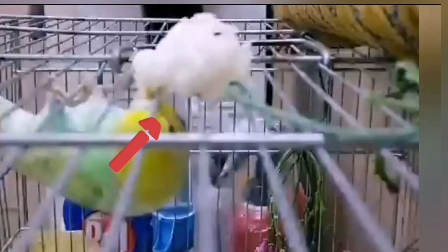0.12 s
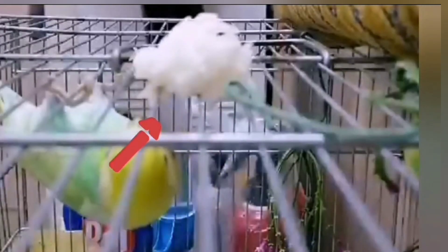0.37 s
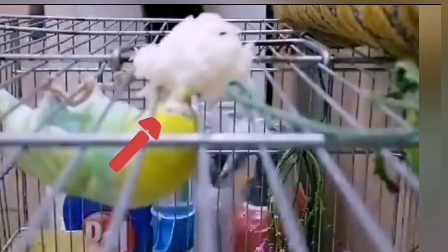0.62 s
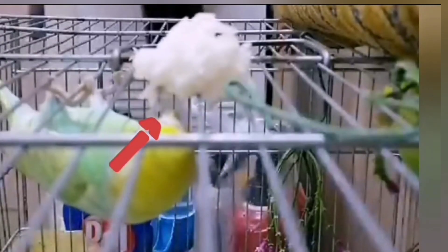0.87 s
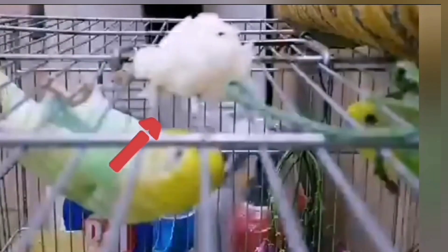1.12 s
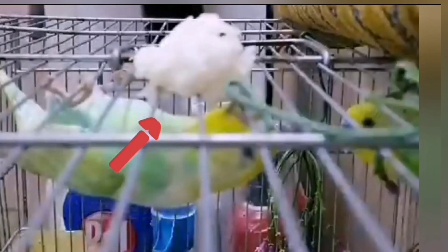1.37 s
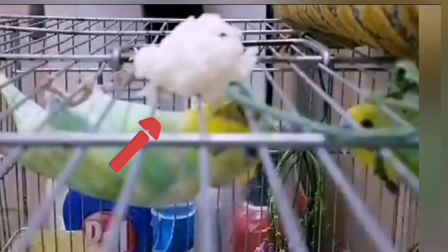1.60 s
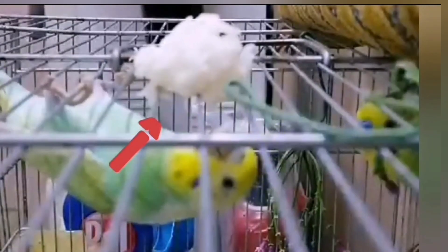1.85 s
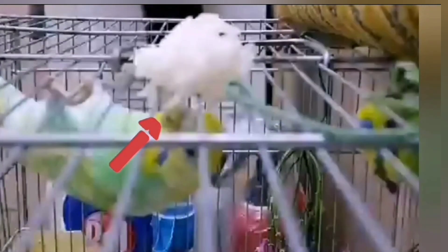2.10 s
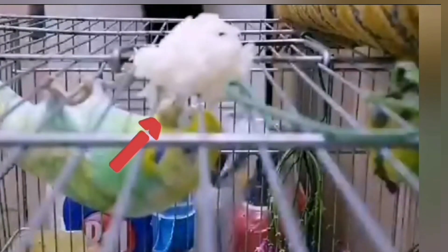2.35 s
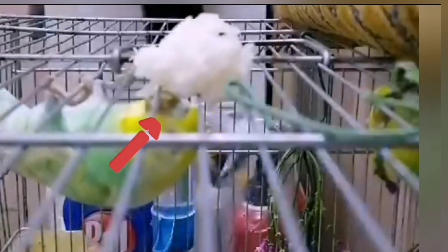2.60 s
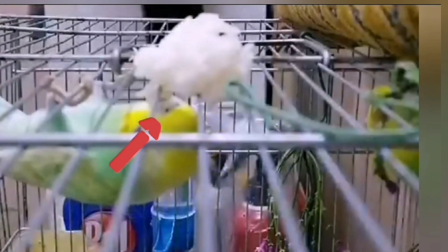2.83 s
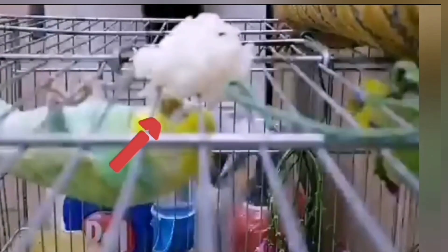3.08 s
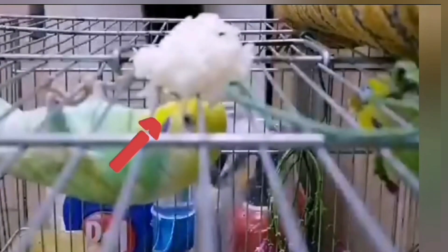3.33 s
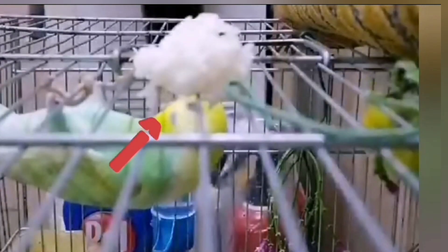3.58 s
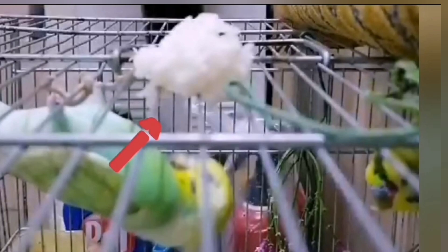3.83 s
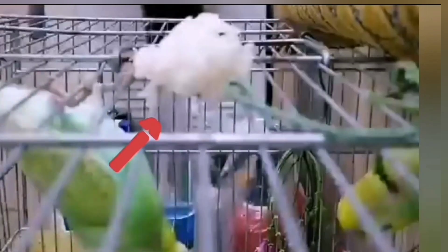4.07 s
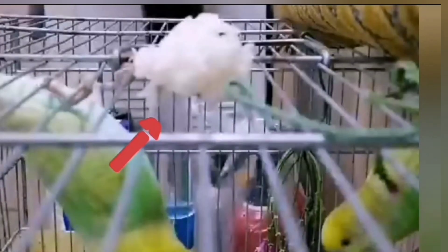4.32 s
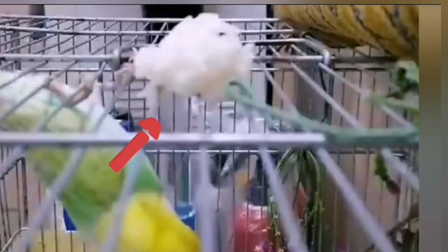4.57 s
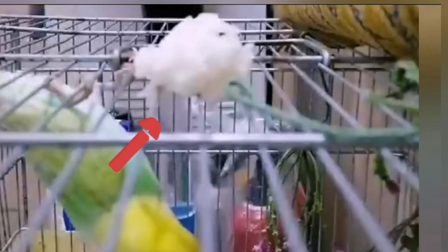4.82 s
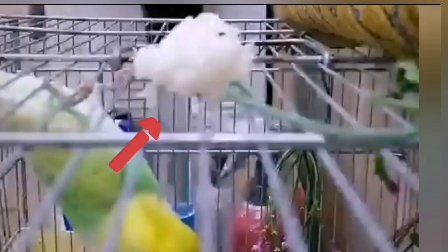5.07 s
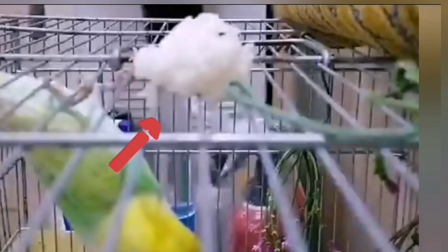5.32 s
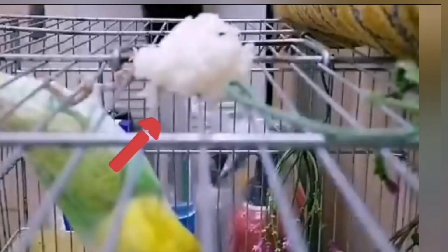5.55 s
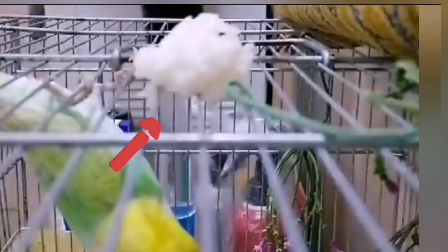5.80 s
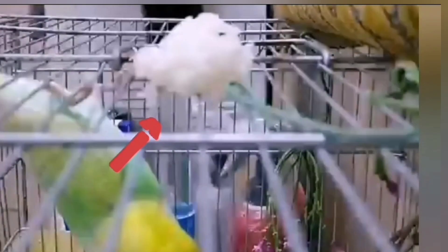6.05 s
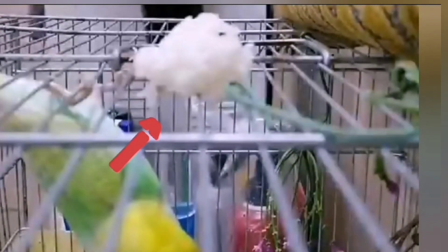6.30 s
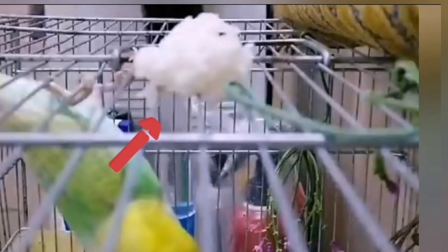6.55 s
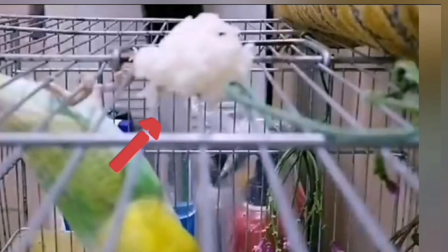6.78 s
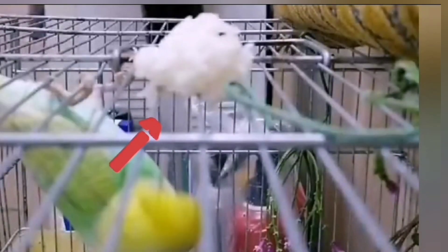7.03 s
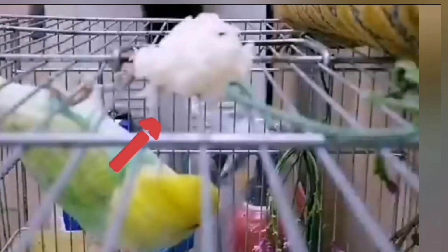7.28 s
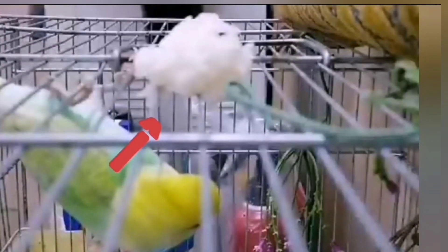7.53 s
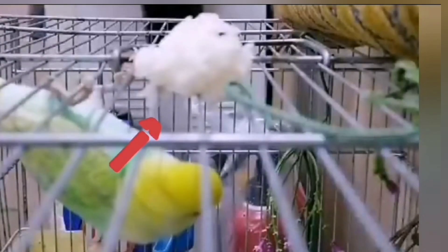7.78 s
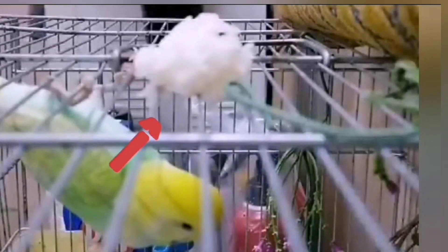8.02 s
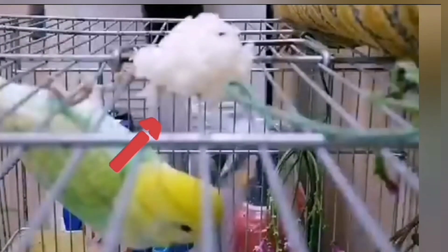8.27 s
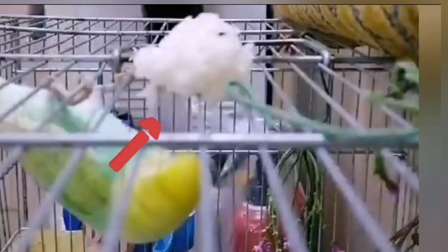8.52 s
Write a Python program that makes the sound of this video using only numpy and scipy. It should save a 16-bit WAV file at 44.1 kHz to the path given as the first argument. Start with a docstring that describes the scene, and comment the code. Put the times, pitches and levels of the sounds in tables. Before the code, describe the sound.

A small parrot moves about a wire cage, heard close in stereo in a quiet room. Quick gritty scrapes and sharp beak ticks come first, then a sparse passage with separate cage jolts that shimmer briefly. A busier cluster of clacks, muted metal pings and scratches follows around the middle, then isolated small taps, and a last firm rattle with a scrape near the end.

```python
"""Parrot climbing in its cage

A small parrot climbs about its wire cage in a quiet room, close to a stereo microphone. Beak and claws tick
on the bars (short bright noise cracks); harder grips jolt the cage, which shimmers briefly (fading streaky noise).
Claws and feathers slide along the wires in soft gritty swishes, a small metal toy pings in blurred modes,
weight thumps dully on the frame, and the room murmurs with drifting air noise."""
import sys
import numpy as np
from scipy import signal
from scipy.fft import rfft, irfft, next_fast_len
from scipy.io import wavfile
from scipy.ndimage import uniform_filter1d, map_coordinates

SR = 44100
rng = np.random.default_rng(int(sys.argv[2]) if len(sys.argv) > 2 else 0)


def persist_wave(psi):
    """Save psi, clipped to +-1, as 16-bit WAV."""
    counts = np.round(np.clip(psi, -1, 1) * 32767).astype(np.int16)
    wavfile.write(sys.argv[1], SR, np.atleast_2d(counts).T)


def field_ratio(decibels):
    """Amplitude ratio for a level in dB (20 dB per decade); scalars and array-likes work."""
    return 10 ** (np.asarray(decibels, dtype=float) / 20)


N = 381024  # samples

# room air over time: t/s, rumble level/dB, murmur level/dB, hiss level/dB
AIR_LEVELS = [(0.0, -58, -59, -71), (0.65, -55.5, -58, -68), (0.98, -53, -57.5, -66.5),
              (3.5, -58, -60.5, -69), (7.1, -58, -63, -71.5), (7.95, -60, -62.5, -70),
              (8.35, -54.5, -63.5, -72), (8.64, -54.5, -60.5, -71)]
# colours of the three air layers: f/Hz, level/dB
RUMBLE_COLOUR = [(8.8, -20), (15, -2), (38, 3), (59, -1), (75, -6), (107, -1), (179, -6), (209, -3),
                 (350, -21), (460, -49), (770, -120)]
MURMUR_COLOUR = [(180, -31), (300, -2), (327, -7.5), (361, -6.5), (562, -8.5), (620, -8.5), (988, -5.5),
                 (1410, -12.5), (3290, -12.5), (4000, -24.5), (5200, -30), (8800, -120)]
HISS_COLOUR = [(2060, -72), (3500, 6), (3960, 0.5), (5230, 6), (6570, 4), (8570, 4.5), (11300, -4),
               (15000, -3), (16500, -12)]
# left-right likeness of the diffuse air: f/Hz, likeness/1
AIR_LIKENESS = [(60, 0.85), (120, 0.91), (240, 0.83), (480, 0.42), (950, 0.092), (1890, 0.1), (3770, -0.33),
                (7520, 0.66), (15000, 0.93)]
# left-right likeness of the nearby cage: f/Hz, likeness/1
CAGE_LIKENESS = [(60, 0.97), (130, 0.17), (290, 0.042), (640, 0.83), (1410, -0.074), (3100, -0.021),
                 (6820, 0.49), (15000, 1)]
# how the microphone ports face the cage: f/Hz, left-right level/dB
PORT_LEAN = [(600, -6.5), (2000, -0.5), (4000, -5), (8500, 3), (13000, 1)]

# weight landing on the frame: t/s, level/dB, tray against frame level/dB, left-right level/dB, t60/s
THUMPS = [(1.745, -49.5, -22, 1, 0.18), (2.27, -64, -3.5, 4, 0.43), (3.443, -51.5, -17, -6, 0.088),
          (4.173, -46, -4.5, 5, 0.27), (4.698, -50, 8, -6.5, 0.47), (4.992, -49, -33, 5, 0.31),
          (5.621, -54, -10, -8, 0.054), (5.997, -56, -11, -8, 0.041), (7.886, -45.5, -24, 5, 0.17),
          (8.468, -48.5, -5.5, 4, 0.22)]
# colours of the frame and the tray: f/Hz, level/dB
FRAME_COLOUR = [(350, -18), (500, -8), (800, -2), (1300, -3.5), (1800, -54)]
TRAY_COLOUR = [(70, -15), (120, -10.5), (270, 1), (450, -4), (680, -10), (900, -32)]

# pings of the toy: t/s, level/dB, extra upper mode level/dB, left-right level/dB, damping/1 (1 = free)
PINGS = [(4.257, -50, -20, -7, 8.8), (4.33, -41, -22, -19, 13), (5.364, -54, -20, -9, 12),
         (5.621, -43.5, -16, -20, 20), (5.999, -47, -20, -14, 19), (6.687, -47.5, 4, -2, 0.96)]
# modes of the toy: f/Hz, level/dB, free t60/s, blur/Hz
TOY_MODES = [(2575, -1.5, 0.32, 210), (5900, -29, 0.087, 200), (7280, -0.5, .28, 330),
             (8280, 1.5, 0.16, 550), (9900, -4, 0.2, 470), (11800, -15, .25, 200), (12500, -11, 0.23, 300)]

# claws and feathers sliding on the wires, one row a stroke:
# loudest t/s, level/dB, hold/s, panel against wires level/dB, left-right level/dB
SLIDES = [(0.01, -37.5, 0.018, -14, -8), (0.074, -40, 0.0041, -24, -3), (0.272, -40, 0.0061, -21, 0.5),
          (0.315, -36.5, 0.0064, -19.5, 1), (0.429, -43.5, 0.051, -10.5, -8), (0.517, -45, .005, -29, -1),
          (0.627, -51, 0.037, -30, -1), (0.777, -48.5, 0.079, -32, 2.5), (0.857, -49.5, 0.032, -27, -1),
          (1.843, -42, 0.012, -11, -11), (3.052, -40, 0.028, -12.5, -8), (3.119, -58, 0.038, -17, -14),
          (4.31, -48, .01, -16, -2.5), (4.532, -52, 0.027, -15.5, 2), (4.587, -42, 0.014, -14, 2.5),
          (4.651, -47.5, 0.078, -12.5, -0.5), (4.797, -61.5, 0.043, -9, -2),
          (5.132, -41, 0.06, -13.5, -0.5), (5.225, -55.5, 0.04, -2.5, -3), (8.055, -38.5, 0.036, -14, -2.5),
          (8.105, -50, 0.025, -16, -7)]
# colour of sliding on the wires, before its hump: f/Hz, level/dB
SWISH_COLOUR = [(2240, -26), (3800, -5), (4350, -4.5), (5580, -3), (7040, -2.5), (7760, -3.5), (8790, -1),
                (11500, -7), (15000, -42), (22000, -120)]
# colours of the cage parts, low to high: f/Hz, level/dB
LOW_PANEL_COLOUR = [(900, -26), (1300, -9.5), (1750, 2.5), (2100, 2), (2500, -51)]
PANEL_COLOUR = [(2000, -20), (2400, -1.5), (2800, 3.5), (3250, -2), (3700, -11.5), (4400, -22), (5500, -52)]
BARS_COLOUR = [(2240, -12), (3800, -6), (4370, -5), (5530, 0), (7170, 3.5), (8200, 2), (8910, 3.5),
               (10800, -4.5), (11500, -13), (15000, -34), (22000, -120)]
TOP_COLOUR = [(6180, -11.5), (10500, 12), (15100, 19), (16100, -35), (16300, -44), (16500, -55)]

# jolts of the cage: t/s, shimmer level/dB, low panel and panel against shimmer level/dB, left-right level/dB
JOLTS = [(0.3526, -38.5, -5.5, -7.5, -7.5), (0.714, -52, -20, -28, 1), (1.156, -50, -7, -5, -9),
         (1.5177, -64, 1.5, -2, -13), (1.7428, -32, -10, -1, -6), (1.94, -61, -20, -17, -14),
         (2.2692, -33, -6.5, -4, -3), (2.4073, -50.5, -35, -27, -8), (2.6968, -63, 1, -3, -10),
         (2.956, -56.5, 2.5, 5, -7), (3.4425, -34, -8.5, -7.5, -8.5), (3.729, -65.5, -0.5, -2, -16),
         (4.1721, -32.5, -12, -2, -4.5), (4.6996, -45.5, -3, -0.5, -5.5), (4.9903, -38.5, -6.5, -4, -2.5),
         (5.723, -61.5, -23, -7, -9), (6.6876, -54.5, -33, -2, -2), (7.13, -59, -5.5, -31, 1),
         (7.865, -46, -21, -22, 1), (7.885, -36, -8.5, -2.5, 4), (8.3574, -65, -6, -28, -4),
         (8.4628, -54, 0, -3, -4.5)]
# dry ticks of beak and claw: t/s, peak level of the left-right mean before panning/dB, centre f/Hz,
# left-right level/dB
TICKS = [(0.0667, -25, 8170, 7), (0.181, -43, 9700, 1), (0.3551, -23, 9400, 16.5), (0.6766, -37, 9400, 1),
         (0.7148, -31.5, 9650, 4), (0.7881, -25, 9200, 2), (0.851, -29, 10000, -1), (0.976, -45, 9100, 0),
         (1.74, -28, 7560, -12), (1.7542, -29, 6750, -14), (1.963, -44.5, 9170, 10), (2.095, -52, 9500, 0),
         (2.2722, -23, 9300, 0), (2.2799, -21.5, 7070, -4), (2.407, -27.5, 8950, 9),
         (2.421, -33, 7390, -1.5), (3.442, -28, 8790, -1), (3.453, -38, 4900, -4), (4.143, -53, 9300, -7),
         (4.173, -21, 7040, -6.5), (4.183, -22, 7400, 1), (4.585, -44, 8800, 3), (4.951, -52, 9500, 3),
         (5.0, -38, 7400, -20), (5.364, -53, 8000, -5), (5.621, -51.5, 10600, -12),
         (5.9976, -38, 7700, -19.5), (6.375, -53, 8100, -3), (6.851, -52.5, 9000, -4),
         (6.6892, -34, 8000, 0), (7.1281, -40.5, 7800, -6), (7.887, -23.5, 9000, 8), (7.898, -28, 7000, -8)]

SWELL_DB_PER_S, FADE_DB_PER_S, PANEL_FADE_DB_PER_S = 319, 271, 202  # a stroke grows and fades; panels ring on
LOW_PANEL_DB, TOP_DB = -7, -8  # in a stroke: low panel against the panel, top against the swish
BRIGHT_HZ, BRIGHT_HZ_PER_DB = 8800, 179  # wires on the left side sound brighter
JOLT_TOP_DB, TOP_LOSS = -7, 0.33  # top against the shimmer; the more the panel takes, the less treble


def unit(x):
    """Scales a signal to rms 1."""
    return x / np.sqrt(np.mean(x ** 2) + 1e-20)


def along(points, hz):
    """Reads (f/Hz, value) points on a log frequency axis."""
    f, v = np.transpose(points)
    return np.interp(np.log(hz + 1), np.log(f + 1), v)


def curves(rows):
    """Draws one value per sample for each column after the time."""
    s, *columns = np.transpose(rows)
    return [np.interp(np.arange(N) / SR, s, column) for column in columns]


def wobble(rate):
    """Draws a smooth random curve with rate knots a second."""
    knots = rng.standard_normal(int(N * rate / SR) + 4)
    return map_coordinates(knots, [np.arange(N) * rate / SR])


def sides(pan_db):
    """Left and right gain for a left-right level difference."""
    return field_ratio(np.array([pan_db / 2, -pan_db / 2]))


def tuned(colour, hz, boost_db, octaves):
    """Adds a hump around one pitch to a colour."""
    grid = np.geomspace(200, 20000, 240)
    hump = boost_db * np.exp(-(np.log2(grid / hz) / octaves) ** 2)
    return np.transpose([grid, along(colour, grid) + hump])


def rush(colour, likeness, size=N, lean=((100, 0),), streak_db=0, streak_hz=60):
    """Stereo noise of rms 1 with a colour, a likeness between the sides and random narrow streaks."""
    padded = next_fast_len(size)
    hz = np.fft.rfftfreq(padded, 1 / SR)
    # the angle shares the power between mid and side so that the sides correlate as asked
    angle = np.arccos(np.clip(along(likeness, hz), -1, 1)) / 2
    streaks = map_coordinates(rng.standard_normal(2000), [hz / streak_hz])
    gain = field_ratio(along(colour, hz) + streak_db * streaks)
    mid, side = rfft(rng.standard_normal((2, padded))) * gain * [np.cos(angle), np.sin(angle)]
    left_right = np.array([mid + side, mid - side]) * sides(along(lean, hz))
    return unit(irfft(left_right, padded)[:, :size])


def patchy(x, size, wide, long, depth_db):
    """Random patches of gain, wide bins by long frames, with an rms depth in dB."""
    z = signal.stft(x, nperseg=size)[2]
    field = uniform_filter1d(rng.standard_normal(z.shape[1:]), wide, axis=0)
    field = uniform_filter1d(field, long, axis=1)
    return signal.istft(z * field_ratio(depth_db * unit(field)), nperseg=size)[1][:, :N]


def add(track, s, sound):
    """Mixes a short sound into a track at a time."""
    part = track[..., max(round(s * SR), 0):][..., :sound.shape[-1]]
    part += sound[..., :part.shape[-1]]


def air():
    """Low rumble, a murmur of far air flow and the microphone's hiss, in faint drifting patches."""
    rumble_db, murmur_db, hiss_db = curves(AIR_LEVELS)
    rumble = field_ratio(rumble_db + 1.2 * wobble(5)) * rush(RUMBLE_COLOUR, AIR_LIKENESS)
    murmur = field_ratio(murmur_db) * rush(MURMUR_COLOUR, AIR_LIKENESS)
    hiss = field_ratio(hiss_db) * rush(HISS_COLOUR, AIR_LIKENESS)
    return patchy(rumble + murmur + hiss, size=4096, wide=3, long=3, depth_db=2.0)


def thumps():
    """Frame and tray answer a shifted weight with a dull, short rumble, a little different each time."""
    t, out = np.arange(SR // 2) / SR, np.zeros((2, N))
    onset = 1 - np.exp(-t / 0.0021)
    for s, db, tray_db, pan_db, t60 in THUMPS:
        fade = field_ratio(db - 60 * t / t60) * onset * sides(pan_db)[:, None]
        frame = rush(FRAME_COLOUR, CAGE_LIKENESS, size=len(t), streak_db=4.5)
        tray = rush(TRAY_COLOUR, CAGE_LIKENESS, size=len(t), streak_db=2.0)
        add(out, s, fade * (frame + field_ratio(tray_db) * tray))
    return out


def toy():
    """Each mode of the toy is a cluster of close partials, so it beats and blurs; a foot may damp it."""
    t, out = np.arange(SR // 2) / SR, np.zeros((2, N))
    onset = 1 - np.exp(-t / 0.00026)
    for s, db, upper_db, pan_db, damping in PINGS:
        for k, (hz, mode_db, t60, blur_hz) in enumerate(TOY_MODES):
            peak = [(hz - 5 * blur_hz, -60), (hz - blur_hz, -14), (hz, 0),
                    (hz + blur_hz, -14), (hz + 5 * blur_hz, -60)]
            cluster = rush(peak, CAGE_LIKENESS, size=len(t))
            level_db = db + mode_db + upper_db * (k > 0)  # the lowest mode is left alone
            fade = field_ratio(level_db - 60 * damping * t / t60) * onset
            add(out, s, sides(pan_db)[:, None] * fade * cluster)
    return out


def slides():
    """A dense, gritty stream of tiny catches; each stroke swells, holds and fades, and the panels ring on a little."""
    out, t = np.zeros((2, N)), np.arange(-SR // 4, SR // 3) / SR  # t = 0 is the middle of the hold
    for s, db, hold_s, panel_db, pan_db in SLIDES:
        early, late = np.maximum(-t - hold_s / 2, 0), np.maximum(t - hold_s / 2, 0)
        swell_db = db - SWELL_DB_PER_S * early
        wires_db = swell_db - FADE_DB_PER_S * late
        body_db = swell_db + panel_db - PANEL_FADE_DB_PER_S * late
        swish = tuned(SWISH_COLOUR, BRIGHT_HZ + BRIGHT_HZ_PER_DB * pan_db, boost_db=10.5, octaves=0.67)
        before = max(-round((s + t[0]) * SR), 0)  # samples that fall ahead of the start
        layers = [(swish, wires_db, 2.6), (LOW_PANEL_COLOUR, body_db + LOW_PANEL_DB, 4),
                  (PANEL_COLOUR, body_db, 4), (TOP_COLOUR, wires_db + TOP_DB, 2.5)]
        for colour, level_db, streak_db in layers:
            stream = rush(colour, CAGE_LIKENESS, size=len(t), lean=PORT_LEAN, streak_db=streak_db, streak_hz=90)
            stroke = field_ratio(level_db) * sides(pan_db)[:, None] * stream
            add(out, s + t[0], stroke[:, before:])
    grit = field_ratio(0.67 * wobble(350) + 1.27 * wobble(60))
    return patchy(out * grit, size=256, wide=6, long=7, depth_db=1.5)


def jolts():
    """Countless wire modes shimmer, a new set for each grip; the treble dies first."""
    t, out = np.arange(SR // 2) / SR, np.zeros((2, N))
    swell = 1 - np.exp(-t / 0.0033)  # the shock takes time to spread over the cage
    for s, db, low_db, panel_db, pan_db in JOLTS:
        top_db = JOLT_TOP_DB - TOP_LOSS * panel_db
        parts = [(LOW_PANEL_COLOUR, low_db, 0.3), (PANEL_COLOUR, panel_db, 0.28),
                 (BARS_COLOUR, 0, 0.32), (TOP_COLOUR, top_db, 0.24)]
        for colour, level_db, t60 in parts:
            shimmer = rush(colour, CAGE_LIKENESS, size=len(t), lean=PORT_LEAN, streak_db=3.6, streak_hz=70)
            fade = field_ratio(db + level_db - 60 * t / t60) * swell
            add(out, s, fade * sides(pan_db)[:, None] * shimmer)
    return out * field_ratio(1.34 * wobble(160))  # loose wires chatter


def ticks():
    """Horn on steel: a broad crack a few milliseconds long."""
    t, out = np.arange(SR // 20) / SR, np.zeros((2, N))
    fade = field_ratio(-60 * t / 0.014) * (1 - np.exp(-t / 0.00029))
    broad = [(900, -40), (2500, -15.5), (4200, -12), (7000, -2), (15500, -2.5), (16500, -46)]  # f/Hz, level/dB
    for s, db, hz, pan_db in TICKS:
        colour = tuned(broad, hz, boost_db=13.5, octaves=0.12)
        crack = rush(colour, [(1000, 0.28)], size=len(t)) * fade
        crack = crack / np.abs(crack.mean(axis=0)).max()
        add(out, s, field_ratio(db) * sides(pan_db)[:, None] * crack)
    return out


def scene():
    """The cage in its room."""
    return air() + thumps() + toy() + slides() + jolts() + ticks()


def low_pass(x):
    """Removes everything above the highest recorded frequency."""
    return signal.sosfilt(signal.butter(12, 16660, fs=SR, output="sos"), x)


def record(dry):
    """Takes the finished mix to its recorded form."""
    return low_pass(dry)


dry = scene()
out = record(dry)
persist_wave(out)
```